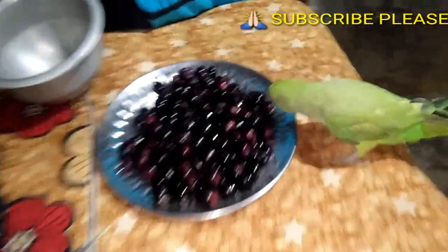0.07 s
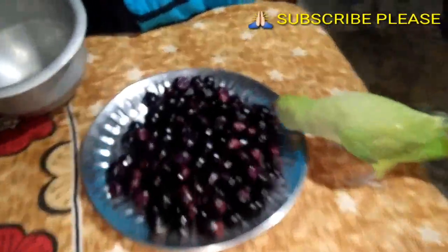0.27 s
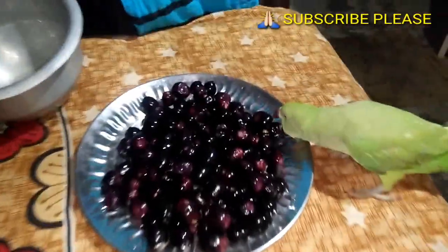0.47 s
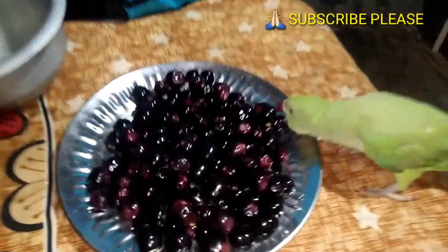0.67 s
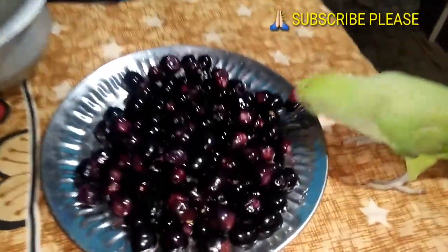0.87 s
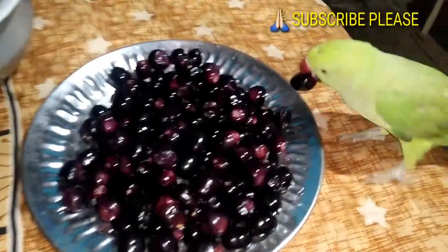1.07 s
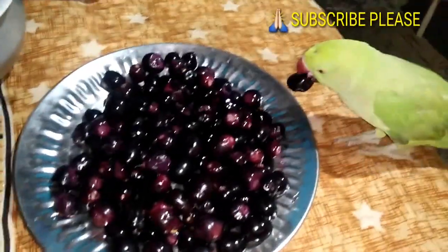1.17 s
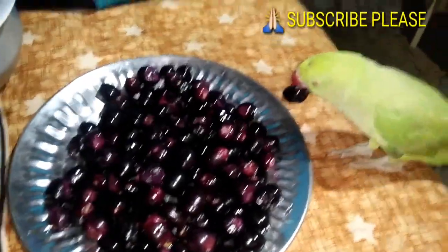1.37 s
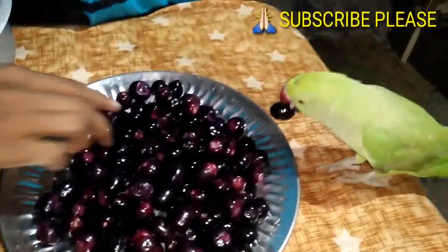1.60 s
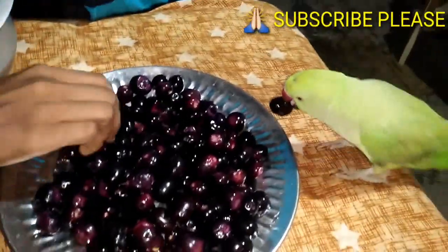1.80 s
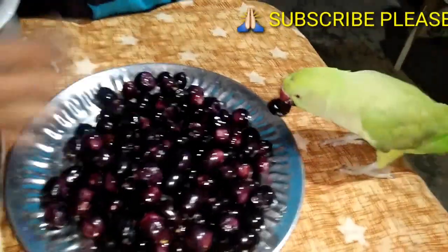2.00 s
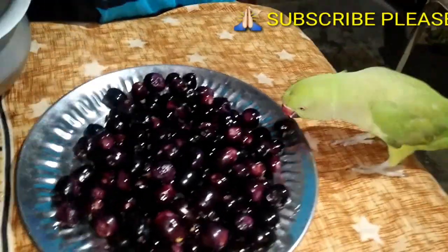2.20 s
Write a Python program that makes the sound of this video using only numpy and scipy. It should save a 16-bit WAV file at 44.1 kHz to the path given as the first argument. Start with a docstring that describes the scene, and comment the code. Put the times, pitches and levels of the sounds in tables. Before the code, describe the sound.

A parakeet screeches twice close by, at about 0.2 and 0.6 seconds, over a quiet room hush. Each call swoops from a thin whistle into a loud, rough screech with a brief echo, the second cut short. From 0.8 to 1.1 seconds its beak ticks faintly on a steel plate. Soft table bumps follow until about 2.2 seconds, with light cloth rustles around 1.5 and 2.1 seconds.

```python
"""Over quiet room noise and the fading ring of an earlier call, a parakeet on a table calls twice.
Each time a thin whistle swoops up into a loud screech, roughened by a fast flutter in the voice,
and rings in the room. The second ring is cut short. The bird then picks fruit from a steel plate
with faint ticks, and a hand reaches in: soft bumps on the table and a rustle of cloth."""
import sys
import numpy as np
from scipy import signal
from scipy.fft import rfft, irfft, next_fast_len
from scipy.io import wavfile
from scipy.ndimage import uniform_filter1d, map_coordinates

SR = 44100
rng = np.random.default_rng(int(sys.argv[2]) if len(sys.argv) > 2 else 0)


def bounce(signal):
    """Save signal as a 16-bit WAV file at the path given by the first command-line argument."""
    frames = np.transpose(np.atleast_2d(signal))
    limited = np.clip(frames, -1, 1)
    pcm = np.round(limited * 32767).astype(np.int16)
    wavfile.write(sys.argv[1], SR, pcm)


N = 99225
NEAR_WIDTH, ROOM_WIDTH = 0.081, 0.43  # stereo width of close sounds and of echoes

# tone of the cloth's rustle and the beak's crack (frequency [Hz], level [dB])
RUSTLE_TONE = [(100, 2), (600, -6), (2000, -2), (3200, -0.5), (4900, 2.5), (6200, -12.5), (9000, -18),
               (13000, -17.5), (14200, -32), (15000, -59.5)]


def amp(db):
    """Turn decibels into a gain; amp(-60 * t / fade) drops 60 dB in the fade time."""
    return 10 ** (np.asarray(db) / 20)


def unit(x):
    """Scale to an average (rms) strength of 1."""
    return x / np.sqrt(np.mean(x ** 2) + 1e-20)


def along(points, hz):
    """Read between (frequency, value) points on a log frequency axis."""
    freqs, values = np.transpose(points)
    return np.interp(np.log(hz + 1), np.log(freqs + 1), values)


def since(start):
    """Seconds since start, zero before."""
    return np.maximum(np.arange(N) / SR - start, 0)


def wobble(rate):
    """A smooth random curve through `rate` points a second."""
    return map_coordinates(rng.standard_normal(N // 4), [np.arange(N) * rate / SR], mode="wrap")


def filtered(x, response):
    """Scale each frequency in x by response(hz)."""
    size = next_fast_len(N + 8192)
    return irfft(rfft(x, size) * response(np.fft.rfftfreq(size, 1 / SR)), size)[..., :N]


def spread(pair, width):
    """Left and right from two unrelated signals; width 0 is mono."""
    return np.array([pair[0] + width * pair[1], pair[0] - width * pair[1]])


def noise(tone, width):
    """Stereo noise of strength 1 with the given tone."""
    white = rng.standard_normal((2, N))
    return unit(spread(filtered(white, lambda hz: amp(along(tone, hz))), width))


def room_noise():
    """A quiet, low hush whose level wavers slightly."""
    # (frequency [Hz], level [dB])
    hush_tone = [(15, -41.5), (25, -9.5), (79, -2.5), (274, -3.5), (349, -8.5), (378, -10.5), (445, -2.5),
                 (523, -11.5), (722, -9.5), (2700, -8.5), (3930, -19.5), (4870, -13), (7500, -36),
                 (10100, -29.5), (15500, -48)]
    return amp(-57 + .7 * wobble(12)) * noise(hush_tone, width=0.067)


def cloth():
    """Short grainy strokes as the arm moves over the tablecloth."""
    # (start [s], hold [s], level [dB])
    strokes = [(1.444, 0.081, -54.5), (1.458, 0.015, -49.5), (1.544, 0.021, -46.5), (1.578, .035, -46),
               (1.622, 0.024, -53.5), (2.094, .03, -46.5), (2.125, 0.041, -47.5), (2.172, 0.15, -52)]
    rise_s, fade_s, grain_db = 0.0031, 0.099, 2.5
    power = np.zeros(N)
    for start, hold, db in strokes:
        rise = 1 - np.exp(-since(start) / rise_s)
        power += (rise * amp(db - 60 * since(start + hold) / fade_s)) ** 2
    return np.sqrt(power) * unit(amp(grain_db * wobble(300)) * noise(RUSTLE_TONE, NEAR_WIDTH))


def table_bumps():
    """Each soft bump gives the table a low, quickly dying swing and a dull knock."""
    # (time [s], level [dB], pitch [Hz])
    bumps = [(1.079, -35, 189.4), (1.294, -40.5, 130.8), (1.408, -44, 69.8), (1.501, -39, 90.2),
             (1.555, -49, 117.6), (1.603, -51, 130.2), (1.961, -37.5, 140), (2.09, -29, 150.3),
             (2.243, -40.5, 160.4)]
    # (frequency [Hz], level [dB])
    knock_tone = [(40, 2), (250, 4), (500, -14), (2000, -7), (5000, -16), (12000, -50)]
    rise_s, swing_fade_s, knock_fade_s = 0.0016, .04, 0.053
    knock_noise = noise(knock_tone, NEAR_WIDTH)
    out = np.zeros((2, N))
    for start, db, hz in bumps:
        t = since(start)
        swing = amp(-60 * t / swing_fade_s) * np.sin(2 * np.pi * hz * t)
        knock = amp(-8 - 60 * t / knock_fade_s) * knock_noise
        out += amp(db) * (1 - np.exp(-t / rise_s)) * (swing + knock)
    return out


def plate_ticks():
    """Each touch of the beak cracks faintly and rings the steel plate."""
    # (time [s], level [dB])
    touches = [(.828, -65), (.938, -68), (1.006, -63.5), (1.082, -46.5)]
    # (frequency [Hz], level [dB], fade time [s])
    steel_notes = [(5050, -6, 0.16), (6342, -19, 0.17), (9600, -11, 0.11), (10480, 4, 0.07),
                   (11940, -12, 0.11)]
    crack_fade_s = 0.034
    out = np.zeros((2, N))
    for start, touch_db in touches:
        t = since(start)
        ring = sum(amp(db - 60 * t / fade) * np.sin(2 * np.pi * hz * t) for hz, db, fade in steel_notes)
        crack = (t > 0) * amp(-6 - 60 * t / crack_fade_s) * noise(RUSTLE_TONE, NEAR_WIDTH)
        out += amp(touch_db) * (ring + crack)
    return out


def room_echo(x):
    """Add early echoes from table and walls, which give way to a smooth ringing tail."""
    # how long the room rings (frequency [Hz], fade time [s])
    fade_times = [(200, 0.356), (1500, 0.3), (3500, 0.39), (9000, 0.38), (14000, 0.32)]
    early_s, early_db, tail_db = 0.014, -2, -9
    hz, t, bands = signal.stft(rng.standard_normal((2, SR * 2 // 3)), SR, nperseg=256)
    bands *= amp(-60 * t / along(fade_times, hz)[:, None])
    tail = spread(signal.istft(bands, SR, nperseg=256)[1], ROOM_WIDTH)
    early_share = np.exp(-np.arange(tail.shape[1]) / SR / early_s)
    tail *= 1 - early_share
    early = spread(rng.standard_normal(tail.shape), ROOM_WIDTH) * early_share
    echoes = amp(tail_db) * tail / np.linalg.norm(tail[0])
    echoes += amp(early_db) * early / np.linalg.norm(early[0])
    return x + signal.fftconvolve(x[None], echoes, axes=1)[:, :N]


def call(curve, screech):
    """A gliding whistle: effort opens it into a screech, and a second, slower vibration roughens it."""
    # harmonics 1-8 (multiples of the pitch) of the soft whistle and the falling rasp (level [dB])
    whistle = [-18, -0.5, -8, -20.5, -27.5, -23, -35.5, -24]
    rasp = [-14, -4.5, 0.5, -7, -1.5, -3, -9.5, -15]
    # how the beak colours the voice, and the tone of the breath (frequency [Hz], level [dB])
    beak_tone = [(900, -1.5), (6800, -1), (7500, -17), (8400, 0), (10000, 0), (10800, -15), (12500, -15.5),
                 (15000, -29.5)]
    breath_tone = [(300, -44.5), (900, -21), (1500, -3.5), (2100, -4), (3000, -6.5), (4000, -7.5),
                   (6300, -2.5), (7400, -23.5), (9000, 1.5), (10200, -9.5), (11000, -10.5), (15000, -36.5)]
    screech_from_db, screech_range_db, full_rasp_hz_per_s = -36, 11, 9400
    flutter_hz, flutter_depth, flutter_swing_rad = 290, .9, 0.26
    t = since(0)
    times, *columns = np.transpose(curve)
    pitch, db, rough = [np.interp(t, times, column) for column in columns]
    gate = np.interp(t, [times[0] - .005, times[0], times[-1], times[-1] + .005], [0, 1, 1, 0])
    opened = np.clip((db - screech_from_db) / screech_range_db, 0, 1)
    fall_speed = -uniform_filter1d(np.gradient(pitch), size=300) * SR
    falling = np.clip(fall_speed / full_rasp_hz_per_s, 0, 1) ** 2
    flutter = rough * np.sin(2 * np.pi * np.cumsum(flutter_hz * (1 + 0.0639 * wobble(80))) / SR)
    shaky_pitch = pitch * (1 + .03 * rough * wobble(602))
    phase = 2 * np.pi * np.cumsum(shaky_pitch) / SR + flutter_swing_rad * flutter
    voice = np.zeros(N)
    for k, (soft_db, loud_db, rasp_db) in enumerate(zip(whistle, screech, rasp), 1):
        effort_db = soft_db + opened * (loud_db - soft_db)
        harmonic_db = effort_db * (1 - falling) + rasp_db * falling + along(beak_tone, k * pitch)
        hoarseness = 1 + 0.94 * rough * wobble(890)
        voice += amp(harmonic_db) * hoarseness * np.sin(k * phase)
    voice *= np.sqrt(2) * (1 + flutter_depth * flutter)
    breath = amp(-13.5) * rough * noise(breath_tone, width=0)[0]
    return amp(db) * gate * (voice + breath)


def parakeet():
    """Two calls ring in the room after the dying ring of an earlier one, then stop abruptly."""
    # the course of each call (time [s], pitch [Hz], level [dB], roughness [0-1])
    first_call = [(.045, 1000, -58, 0.14), (.07, 1009, -40, 0), (.1, 972, -37.5, 0),
                  (.13, 977, -38.5, 0.11), (.148, 1025, -49.5, 0), (.165, 1049, -34.5, 0.2),
                  (.18, 1064, -34.5, 0.12), (.208, 1322, -17, 0.31), (.234, 1502, -12.5, 0.18),
                  (.25, 1592, -8, 0.22), (.28, 1601, -9, 0.1), (.29, 1539, -20.5, 0.29),
                  (.31, 1291, -26, 0.46), (.325, 1103, -38, 0.5)]
    second_call = [(.435, 864, -64.5, .05), (.454, 944, -39.5, 0.026), (.53, 971, -43.5, 0.034),
                   (.546, 1007, -38.5, 0.052), (.568, 1083, -35.5, .15), (.585, 1151, -35.5, 0.17),
                   (.604, 1359, -29.5, 0.69), (.63, 1654, -16.5, 0.48), (.656, 1731, -17, .3),
                   (.684, 1647, -17, 0.24), (.697, 1574, -26, 0.35), (.715, 1309, -32, 0.72),
                   (.73, 1104, -63.5, 0.71)]
    # harmonics 1-8 of each screech (level [dB])
    first_screech = [-20, 1.5, -22, -11.5, -21.5, -18, -31, -30.5]
    second_screech = [-12.5, 2, -10.5, -7.5, -1, -14, -20, -40.5]
    # the earlier call's ring (frequency [Hz], level [dB])
    ring_tone = [(530, -61), (900, -36.5), (1490, -24.5), (2310, -34.5), (2470, -11.5), (3040, -1),
                 (4190, -5), (5590, -14.5), (9150, -9.5), (10900, -28.5), (13200, -38), (14000, -54.5)]
    ring_fade_s, cut_at_s, cut_fade_s = .55, .738, 0.015
    calls = room_echo(call(first_call, first_screech) + call(second_call, second_screech))
    earlier_ring = amp(-34 - 60 * since(0) / ring_fade_s) * noise(ring_tone, ROOM_WIDTH)
    lean_right = amp([[-.5], [.5]])
    return (calls + earlier_ring) * lean_right * amp(-60 * since(cut_at_s) / cut_fade_s)


def scene():
    """Bird, plate, table and cloth over the room's noise."""
    return parakeet() + plate_ticks() + table_bumps() + cloth() + room_noise()


def record(dry):
    """Remove the very highest treble."""
    return filtered(dry, lambda hz: hz < 15700)


dry = scene()
out = record(dry)
bounce(out)
```